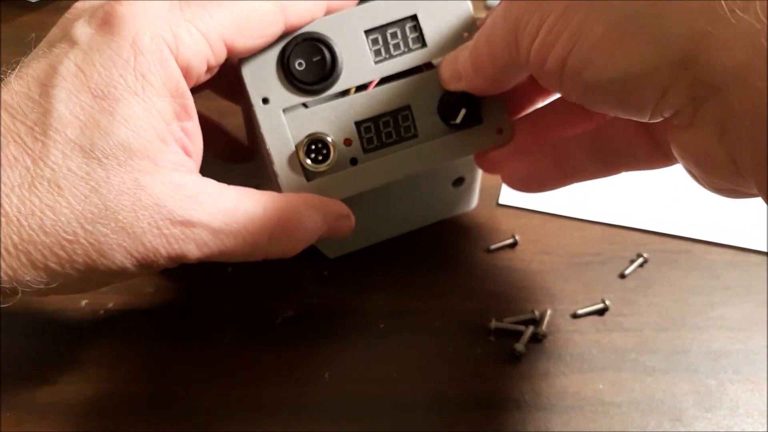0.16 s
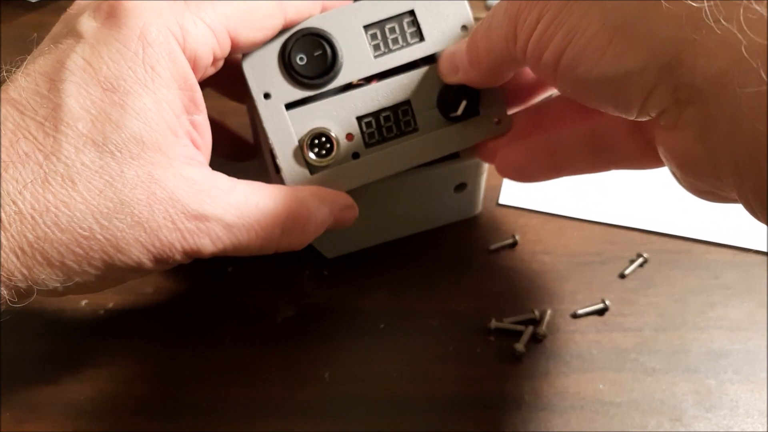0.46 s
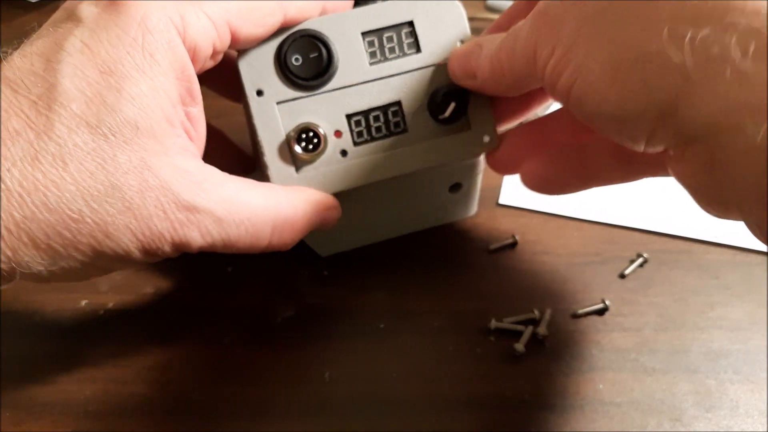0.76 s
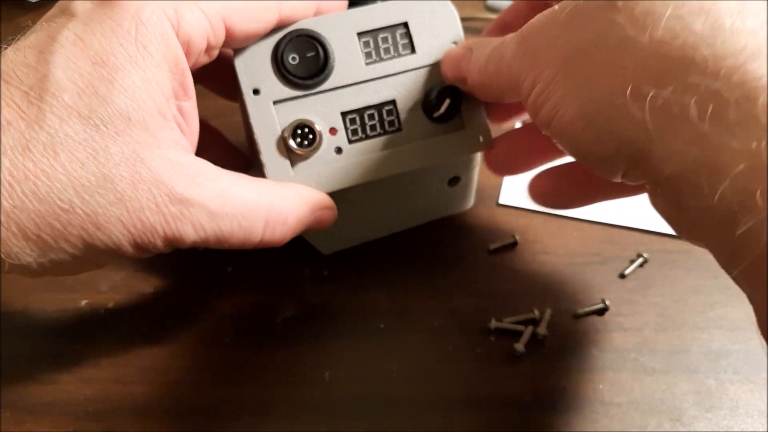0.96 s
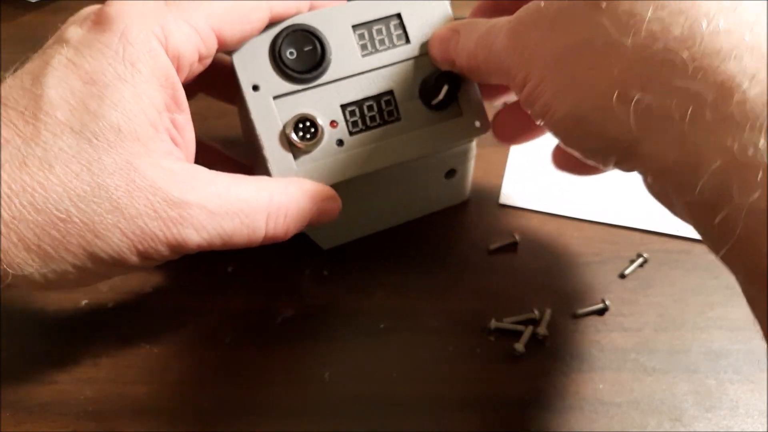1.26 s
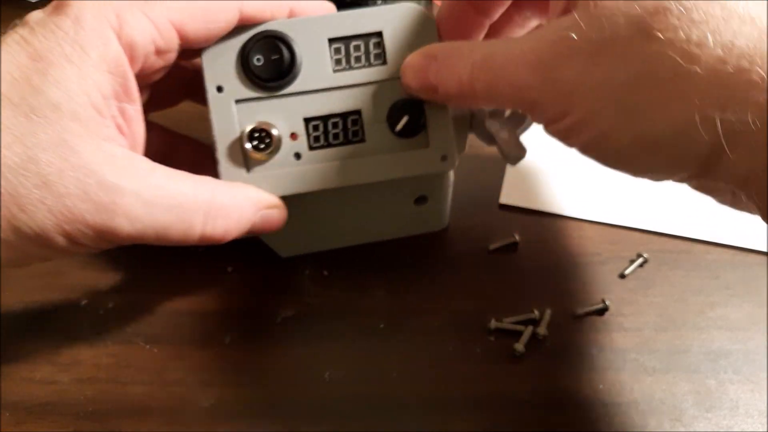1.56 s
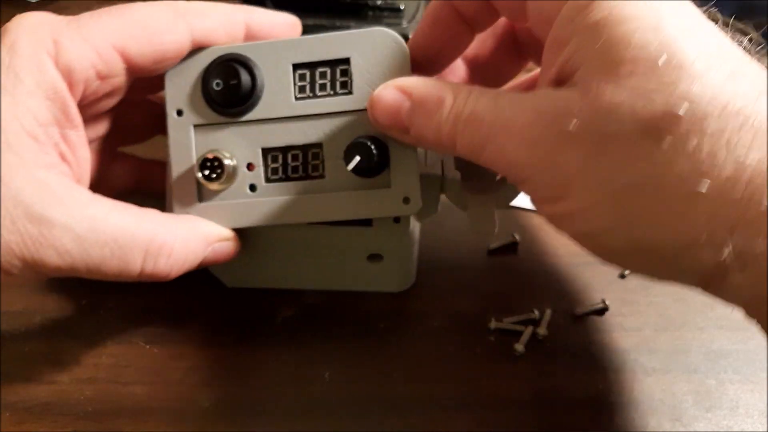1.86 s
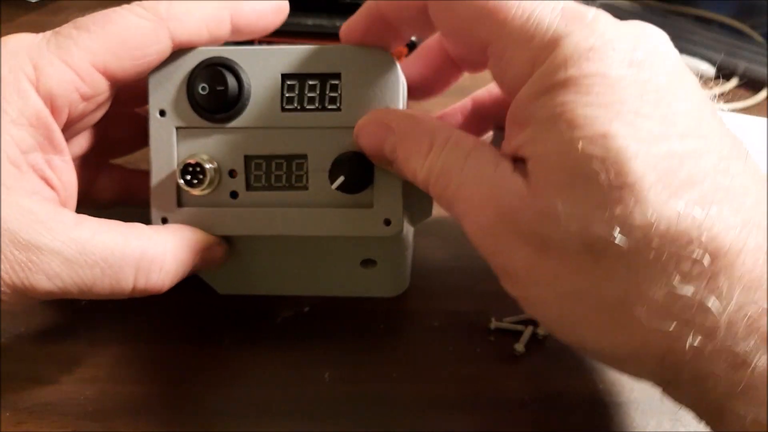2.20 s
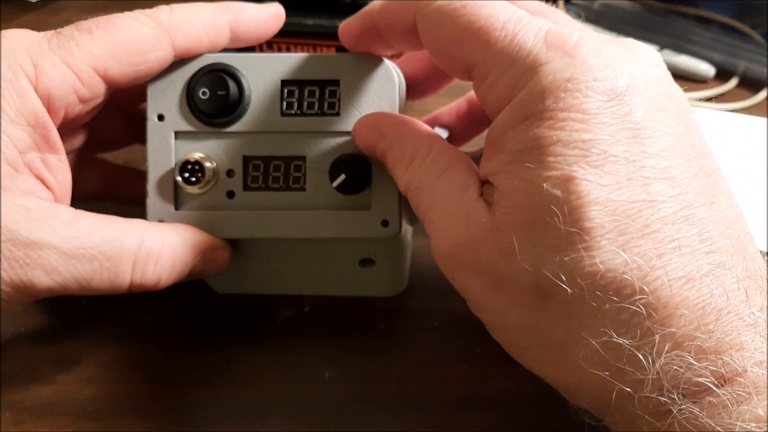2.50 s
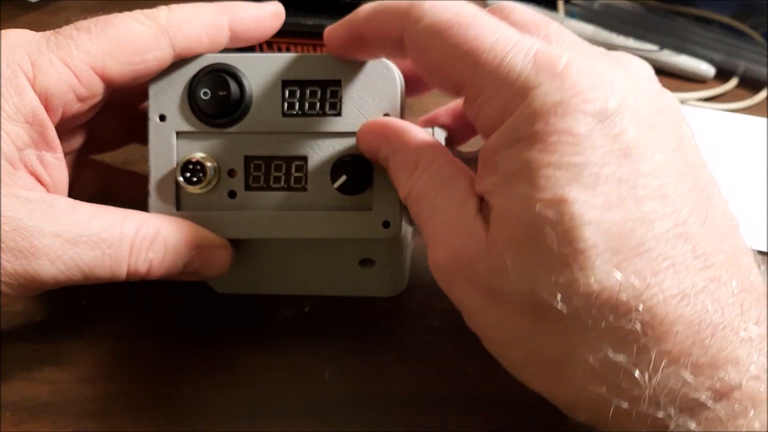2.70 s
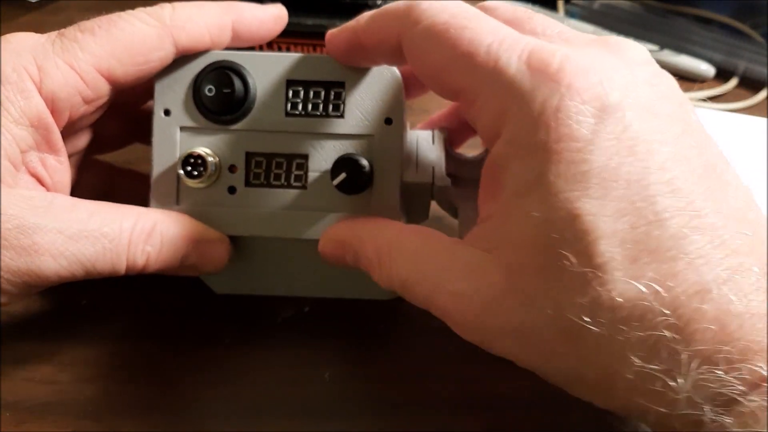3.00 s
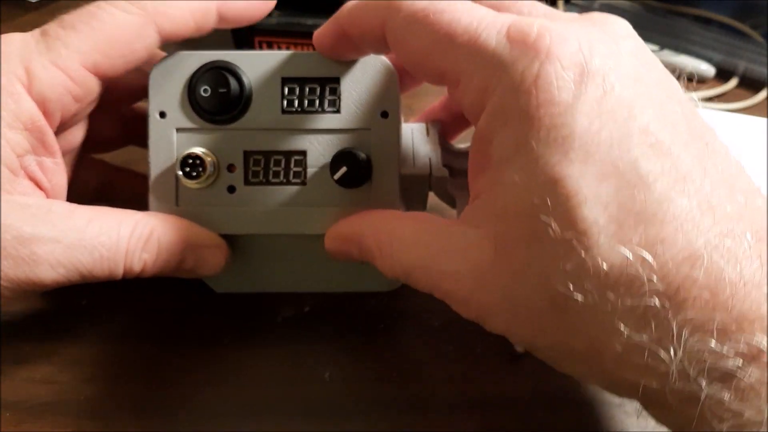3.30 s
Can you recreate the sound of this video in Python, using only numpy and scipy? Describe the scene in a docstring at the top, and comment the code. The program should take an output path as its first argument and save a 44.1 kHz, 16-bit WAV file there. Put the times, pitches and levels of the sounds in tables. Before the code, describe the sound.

Small plastic case clicking, tapping and softly scraping in the hands, ending with one sharp snap

```python
"""Plastic case on a wooden desk

A small printed plastic case is handled on a wooden desk, close under two microphone ports.
Taps excite the damped modes of case, panel and desk, each topped by a crack of filtered noise.
Scrapes are dense random slips through the same modes, with a hiss of noise.
A small dry room adds a diffuse tail; wavering room tone and a low wavering rumble lie behind."""
import sys
import numpy as np
from scipy import signal
from scipy.fft import rfft, irfft
from scipy.io import wavfile
from scipy.ndimage import uniform_filter1d

SR = 44100
rng = np.random.default_rng(int(sys.argv[2]) if len(sys.argv) > 2 else 0)


def waveform_to_disk(signal):
    """Save audio, clipped to [-1, 1], as 16-bit WAV at the path in sys.argv[1]."""
    frames = np.transpose(np.atleast_2d(signal))
    scaled = np.clip(frames, -1, 1) * 32767
    samples = np.round(scaled).astype(np.int16)
    wavfile.write(sys.argv[1], SR, samples)


N = 152145  # samples in the scene


def undb(db):
    """Level to amplitude: 20 dB is a factor of ten."""
    return 10 ** (np.asarray(db) / 20)


def unit(x):
    """Normalisation to a root-mean-square value of one."""
    return x / np.sqrt(np.mean(x ** 2))


def colour(x, points):
    """Linear filtering: the spectrum is weighted by (frequency [Hz], gain [dB]) joined on a log axis."""
    n = x.shape[-1]
    p = np.array(points, float)
    hz = np.maximum(np.arange(n // 2 + 1) * SR / n, 1)
    gain_db = np.interp(np.log(hz), np.log(p[:, 0]), p[:, 1])
    return irfft(rfft(x) * undb(gain_db), n)


def band(points):
    """Band limiting: the spectrum falls by 30 dB just outside its ends."""
    (low_hz, low_db), (high_hz, high_db) = points[0], points[-1]
    return [(low_hz / 2, low_db - 30)] + list(points) + [(high_hz * 1.3, high_db - 30)]


def curve(table, column):
    """Envelope by linear interpolation of one table column over time."""
    t = np.array(table, float)
    return np.interp(np.arange(N) / SR, t[:, 0], t[:, column])


def fade(t60, length):
    """Exponential decay: the amplitude falls by 60 dB in t60 seconds."""
    return np.exp(-np.log(1000) * np.arange(length) / SR / max(t60, 1e-3))


ALIKE_HZ = 1083  # the ports hear alike below this


def pair(x, other):
    """Coherence: the ports share the long waves, while the right one hears another mix of the short."""
    lowpass = signal.butter(2, ALIKE_HZ, fs=SR, output="sos")
    return np.array([x, other + signal.sosfiltfilt(lowpass, x - other)])


def walk(rate):
    """Slow random modulation: noise steps at the given rate [Hz], smoothed twice."""
    k = int(SR / rate)
    steps = np.repeat(rng.standard_normal(N // k + 1), k)
    return uniform_filter1d(uniform_filter1d(steps, k), k)[:N]


TAP_LEN = 6000  # samples
SCATTER_DB, DETUNE = 3, .04  # spread of mode level [dB] and of pitch [fraction]: each tap meets the modes differently
FAVOUR_DB = 15  # loss of a mode an octave from the favoured pitch


def ring(modes, favour_hz=None, alike=False):
    """Modal superposition: a blow excites a sum of damped sines, strongest near favour_hz."""
    t = np.arange(TAP_LEN) / SR
    vary = not alike
    y = 0
    draws = rng.standard_normal((len(modes), 3))
    for (hz, db, t60), (strength, detune, polarity) in zip(modes, draws):
        off_db = FAVOUR_DB * np.log2(hz / (favour_hz or hz)) ** 2
        level = undb(db - off_db + SCATTER_DB * strength * vary)
        sine = np.sin(2 * np.pi * hz * (1 + DETUNE * detune * vary) * t)
        y = y + np.sign(polarity) * level * fade(t60, TAP_LEN) * sine
    return y


# Modes of the desk, the case and the panel, for taps and rubbing:
# (frequency [Hz], relative level [dB], decay time t60 [s])
DESK_MODES = [(139, -5, 0.14), (200.6, -7.5, 0.1), (264.2, -1.5, 0.11), (320, -3.5, 0.077),
              (375.7, 3, 0.035)]
CASE_MODES = [(498, -6, 0.026), (687, -4, 0.0071), (791, 2, 0.022), (939, 3.5, 0.023), (1093, 6.5, 0.024)]
PANEL_MODES = [(1305, 2, 0.022), (1619, 4.5, 0.022), (1705, 8, 0.0058), (2350, 1, 0.0082),
               (2467, -7, 0.023)]
# Spectra of the crack of a tap, body and top: (frequency [Hz], relative spectral level [dB])
CRACK_SPECTRUM = [(1530, 4.5), (2600, -3.5), (3770, -9.5), (6230, -7), (7500, -25), (16500, -70.5)]
CRACK_TOP_SPECTRUM = [(3820, -8), (6500, -1), (9000, -3.5), (12700, -1.5), (16000, -12.5)]
# Taps: (time [s], case ring level [dB], desk thud level [dB], click level [dB],
#        level of the click's top [dB], pitch that rings most [Hz])
TAPS = [(0.144, -47.5, -53.5, -56.5, -65, 980), (0.291, -29.5, -49, -78, -62.5, 830),
        (0.304, -27, -35, -44, -79, 605), (0.48, -33.5, -49.5, -58, -62.5, 930),
        (0.78, -38.5, -49, -55, -63, 970), (0.808, -63, -31.5, -47.5, -75, 920),
        (0.819, -26.5, -59, -45, -52.5, 1010), (0.827, -27.5, -27, -46.5, -64, 895),
        (0.894, -60, -66, -50.5, -66, 1110), (1.019, -51.5, -52, -56, -91, 1010),
        (1.038, -40.5, -45.5, -63, -84, 970), (1.396, -40.5, -37.5, -57.5, -54, 800),
        (1.715, -27, -38, -44, -44, 840), (1.724, -34, -52, -48, -62, 1030),
        (1.742, -24, -36, -51, -61, 673), (1.866, -27, -41, -35.5, -34, 1020),
        (1.879, -24.5, -27.5, -71, -67, 1040), (1.903, -27, -32.5, -36, -70, 990),
        (2.01, -17.5, -37, -46.5, -60, 840), (2.032, -23, -31, -45.5, -49.5, 950),
        (2.132, -45, -42, -70, -78, 970), (2.157, -35.5, -67, -76, -88, 860),
        (2.205, -38, -41.5, -61, -70, 830), (2.276, -31.5, -32.5, -40, -56, 810),
        (2.284, -19, -43, -32.5, -41, 840), (2.293, -20, -33.5, -34.5, -45, 925),
        (2.402, -40, -71, -62, -77, 950), (2.43, -29, -46, -41.5, -57, 885),
        (2.466, -35.5, -38.5, -52.5, -64, 900), (2.936, -36, -46.5, -57, -85, 1070),
        (2.968, -20.5, -35, -47, -48, 970), (2.981, -22, -49, -48, -76, 800),
        (3.003, -13.5, -46, -23.5, -18.5, 830), (3.011, -15.5, -21, -18.5, -60, 593)]
CLICK_T60_S, TOP_T60_S, CLICK_RISE_S = 0.028, 0.016, .0025
PUSH_S = 0.0056  # decay time t60 inside the push
GRATE_S, GRATE_DB = 0.029, -4.5  # the rough slide that follows the first contact: t60 and level
PANEL_DB = -1  # ring of the panel over the click
DESK_SHARE = 0.37  # the desk answers at this fraction of the tap's pitch


def contact_push():
    """Contact force: the air hears its rate of change, then the grating of a rough slide."""
    n = 900
    force = fade(PUSH_S, n) * (1 - fade(PUSH_S, n)) ** 2
    push = np.gradient(force)
    slide = fade(GRATE_S, n) * (1 - fade(GRATE_S, n)) * rng.standard_normal(n)
    return push / push.max() + undb(GRATE_DB) * slide


def taps():
    """Impact excitation: a short rough push rings case, panel and desk, and a crack of noise tops it."""
    out = np.zeros((2, N + 20000))
    for s, case_db, desk_db, click_db, top_db, hz in TAPS:
        push = contact_push()
        thud = ring(DESK_MODES, DESK_SHARE * hz)
        bodies = (
            (desk_db, np.array([thud, thud])),
            (case_db, pair(ring(CASE_MODES, hz), ring(CASE_MODES, hz))),
            (click_db + PANEL_DB, pair(ring(PANEL_MODES), ring(PANEL_MODES))),
        )
        direct = 0
        for db, modes in bodies:
            struck = signal.fftconvolve(modes, push[None], axes=1)[:, :TAP_LEN]
            direct = direct + undb(db) * struck / np.abs(struck).max()

        # what the walls return: the same energy, without the grain of this crack
        far = direct
        for db, spectrum, t60 in ((click_db, CRACK_SPECTRUM, CLICK_T60_S),
                                  (top_db, CRACK_TOP_SPECTRUM, TOP_T60_S)):
            noise = unit(colour(rng.standard_normal((2, TAP_LEN)), band(spectrum)))
            crack = undb(db) * noise * fade(t60, TAP_LEN) * (1 - fade(CLICK_RISE_S, TAP_LEN))
            pulse = unit(colour(signal.unit_impulse(TAP_LEN, 100), band(spectrum)))
            direct = direct + crack
            far = far + pulse * np.std(crack)
        i = int(s * SR)
        out[:, i:i + TAP_LEN] += direct
        out[:, i:i + 19999] += room(far)
    return out[:, :N]


RUB_PER_S, RUB_SCATTER_DB = 800, 2.6  # mean rate of slips, mean random boost of a slip
PATCH_DB, PATCH_PER_S = 4.5, 30  # every mode swells and fades alone as the grip shifts


def slips():
    """Stick-slip as a random pulse train: uneven strengths, either polarity."""
    happens = rng.random(N) < RUB_PER_S / SR
    strength = undb(RUB_SCATTER_DB * rng.exponential(size=N))
    return happens * rng.choice([-1, 1], N) * strength


def rung(modes, count):
    """Resonance under random excitation: slips drive modes that come and go, one row for each port."""
    x = np.array([slips() for _ in range(count)])
    total = 0
    for mode in modes:
        response = ring([mode], alike=True)[None]
        sound = signal.oaconvolve(x, response, axes=1)[:, :N]
        total = total + undb(PATCH_DB * walk(PATCH_PER_S)) * sound
    return unit(total)


def hiss_grain(slip_train):
    """Amplitude modulation: each slip opens a decaying burst of noise."""
    envelope = signal.fftconvolve(np.abs(slip_train), fade(0.098, 1700))[:N]
    return envelope * rng.standard_normal(N)


# Spectrum of the rubbing hiss: (frequency [Hz], relative spectral level [dB])
HISS_SPECTRUM = [(1530, -23), (2600, -6.5), (5390, -9.5), (6230, -6), (7260, -24), (16000, -19)]
# Scraping and shuffling: (time [s], case ring level [dB], desk level [dB], panel ring level [dB], hiss level [dB])
RUBBING = [(0, -98, -68.5, -72.5, -89), (.15, -78, -63.5, -83, -73.5), (.25, -98, -80, -72, -73.5),
           (.262, -63, -66, -54.5, -67.5), (.36, -70, -62.5, -68.5, -72), (.72, -76.5, -71, -106, -87.5),
           (.80, -58.5, -72, -84, -61.5), (.87, -54, -50, -55.5, -69.5), (1.0, -65.5, -64, -58.5, -75),
           (1.14, -64, -59.5, -61, -76.5), (1.21, -55, -50.5, -53, -70.5), (1.29, -68.5, -62, -65, -76.5),
           (1.376, -74, -75, -78, -88), (1.384, -58, -61.5, -66.5, -69.5), (1.57, -46.5, -45, -55, -64),
           (1.72, -40.5, -46, -54.5, -55.5), (1.79, -51, -49, -54, -58.5), (1.85, -46, -51, -63, -64),
           (1.98, -63.5, -61.5, -64.5, -71.5), (2.19, -63, -55.5, -70, -77), (2.27, -78, -71, -79, -83),
           (2.46, -57.5, -48, -61.5, -71.5), (2.56, -105, -73.5, -83, -116), (2.80, -98, -79, -84, -87),
           (2.86, -68, -59.5, -65.5, -73.5), (2.875, -49.5, -81, -101, -71.5),
           (2.91, -70, -72, -65.5, -91.5), (3.45, -113, -82, -76, -89)]


def rub():
    """Friction: dense uneven slips of edges and fingers ring case, panel and desk, and hiss."""
    case, desk, panel, hiss = (undb(curve(RUBBING, column=k)) for k in range(1, 5))
    shared = slips()  # both ports hear the hiss of the same slips
    grains = np.array([hiss_grain(shared), hiss_grain(shared)])
    return (case * pair(*rung(CASE_MODES, count=2))
            + panel * pair(*rung(PANEL_MODES, count=2))
            + desk * rung(DESK_MODES, count=1)
            + hiss * unit(colour(grains, band(HISS_SPECTRUM))))


ROOM_T60_S, ROOM_TREBLE_T60_S = 0.26, 0.2
ROOM_DB, ROOM_TREBLE_DB = -3.5, -4.5


def room(x):
    """Diffuse reverberation: decaying noise, its lows lasting longer, drawn anew for every spot on the desk."""
    n = 14000
    lowpass = signal.butter(2, 450, fs=SR, output="sos")
    noise = pair(rng.standard_normal(n), rng.standard_normal(n))
    low = signal.sosfilt(lowpass, noise)
    rise = 1 - fade(0.0031, n)
    tail = 0
    for part, t60, db in ((low, ROOM_T60_S, ROOM_DB),
                          (noise - low, ROOM_TREBLE_T60_S, ROOM_TREBLE_DB)):
        energy_scale = np.sqrt(t60 * SR / 14)  # a longer tail carries more energy
        tail = tail + undb(db) * part * rise * fade(t60, n) / energy_scale
    return signal.fftconvolve(x, tail, axes=1)


FLOOR_DB = -62.5  # middle level of the room tone
# Spectrum of the room tone: (frequency [Hz], relative spectral level [dB])
FLOOR_SPECTRUM = [(24, -39), (40, -3.5), (124, -0.5), (185, -24), (249, -4.5), (570, -27.5), (1210, -17.5),
                  (1410, -47.5), (2440, -33.5), (3060, -54), (16000, -53)]
# Course of the low rumble: (time [s], level [dB])
RUMBLE_COURSE = [(0, -56.5), (1.5, -62.5), (2.2, -52), (2.6, -61.5), (3.05, -57.5)]
# Humps of the low rumble: (frequency [Hz], bandwidth [Hz], relative level [dB])
RUMBLE_HUMPS = [(54.4, 5.5, -3.5), (126.5, 14, -6)]


def background():
    """Filtered noise: room tone of wavering level, and a low rumble in two wavering spectral humps."""
    noise = pair(rng.standard_normal(N), rng.standard_normal(N))
    tone = unit(colour(noise, FLOOR_SPECTRUM)) * undb(FLOOR_DB + 6.6 * walk(5.57))
    rumble = 0
    for hz, width_hz, db in RUMBLE_HUMPS:
        b, a = signal.iirpeak(hz, hz / width_hz, fs=SR)
        hump = unit(signal.lfilter(b, a, rng.standard_normal(N)))
        rumble = rumble + undb(db + 2 * walk(2.7)) * hump
    return tone + undb(curve(RUMBLE_COURSE, column=1)) * rumble


def scene():
    """Superposition: taps with their room, rubbing with its room, and the background add linearly."""
    near = rub()
    return taps() + near + room(near)[:, :N] + background()


LEFT_LAG_S = .0001
BASS_CUT_HZ, TOP_HZ = 59, 16200
# Colour of the ports, left minus right: (frequency [Hz], level difference [dB])
PORT_DIFFERENCE = [(200, 0), (700, -2), (2400, -6), (14000, -12)]


def record(dry):
    """Transduction: two ports of their own colour, the left a little later, then band limiting."""
    late = np.roll(dry[0], int(LEFT_LAG_S * SR))
    left = colour(late, [(hz, db / 2) for hz, db in PORT_DIFFERENCE])
    right = colour(dry[1], [(hz, -db / 2) for hz, db in PORT_DIFFERENCE])
    bass_cut = signal.butter(3, BASS_CUT_HZ, "high", fs=SR, output="sos")
    top_cut = signal.ellip(10, .2, 80, TOP_HZ, fs=SR, output="sos")
    both = signal.sosfilt(bass_cut, np.array([left, right]))
    return signal.sosfilt(top_cut, both)


dry = scene()
out = record(dry)
waveform_to_disk(out)
```